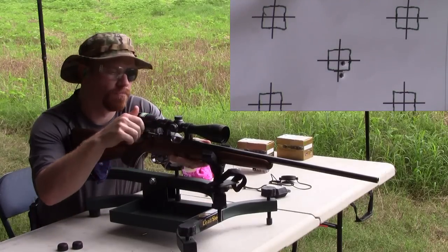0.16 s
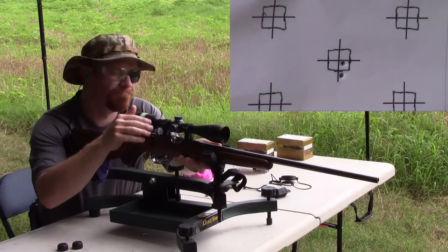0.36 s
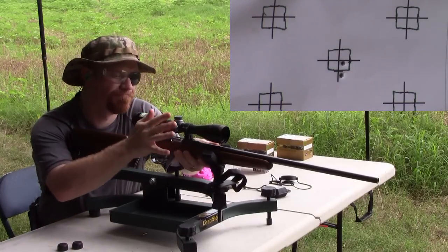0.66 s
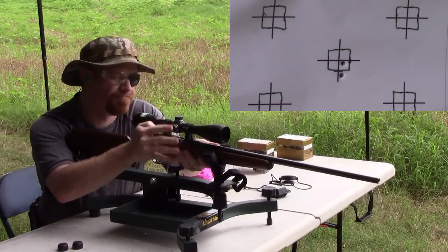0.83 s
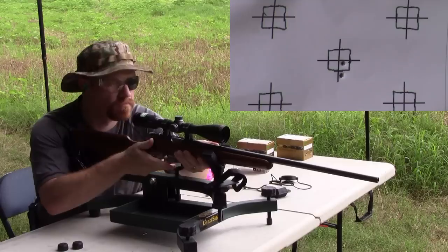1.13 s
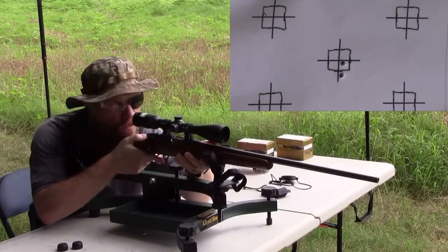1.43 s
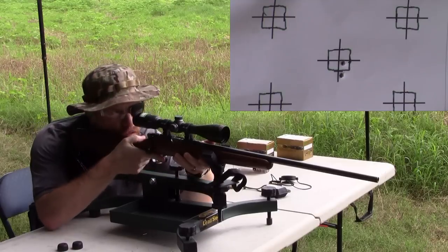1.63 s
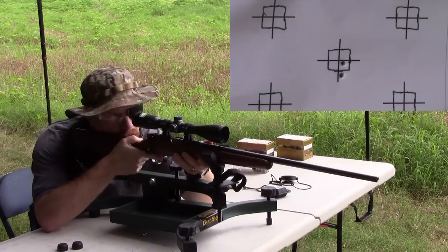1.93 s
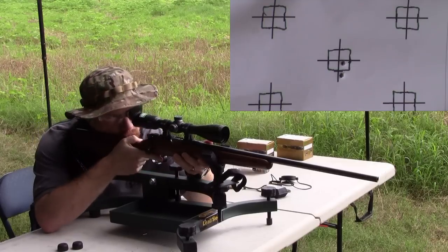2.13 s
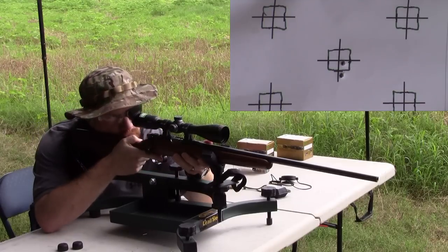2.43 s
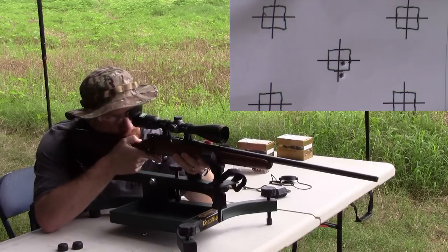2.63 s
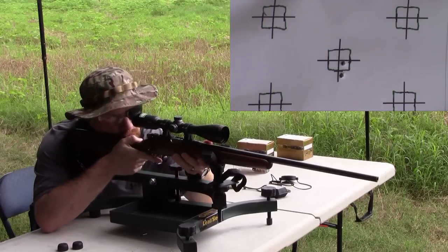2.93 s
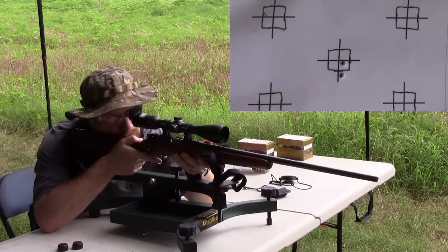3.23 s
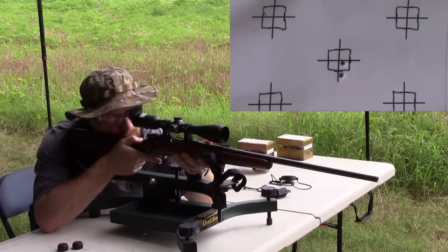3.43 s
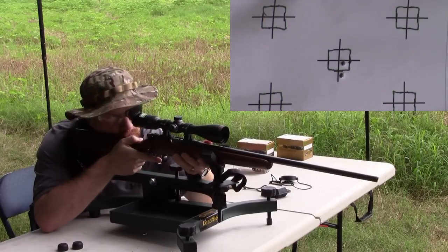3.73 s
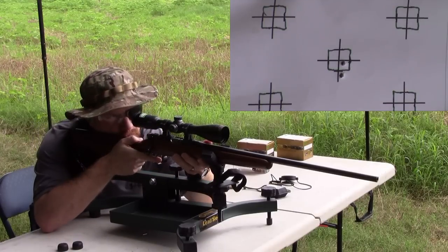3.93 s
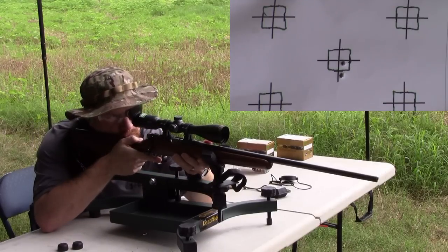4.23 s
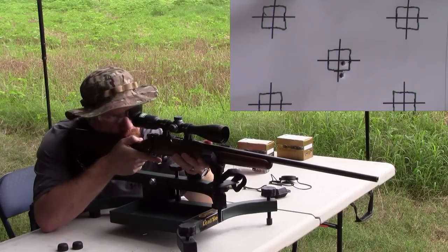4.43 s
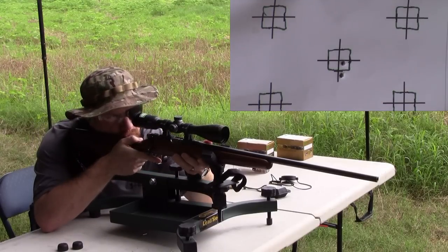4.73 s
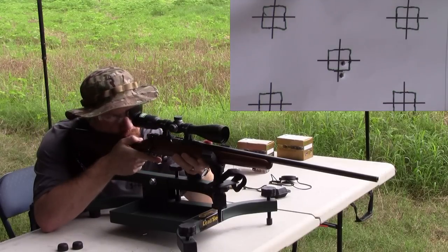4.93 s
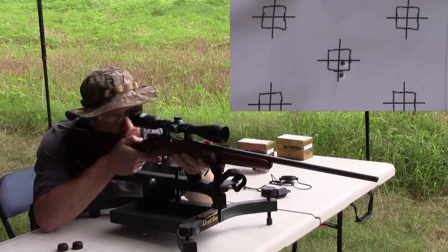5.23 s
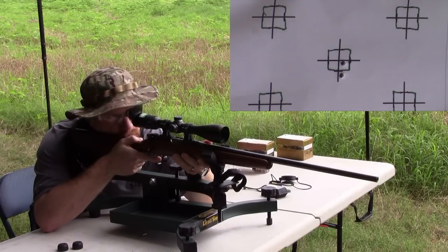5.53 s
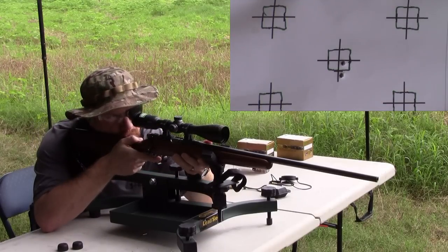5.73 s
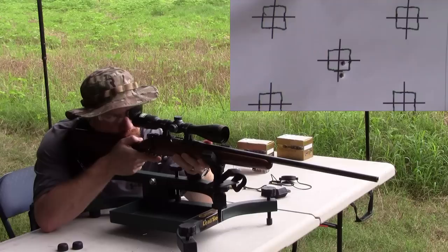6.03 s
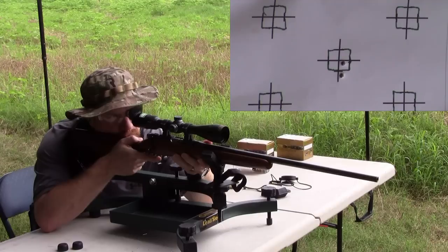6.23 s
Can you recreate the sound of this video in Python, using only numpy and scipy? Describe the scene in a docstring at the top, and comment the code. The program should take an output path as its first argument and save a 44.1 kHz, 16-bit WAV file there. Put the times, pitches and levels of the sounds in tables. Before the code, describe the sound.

At 0 s the low, hollow tail of a knock on an outdoor bench is fading, gone within about half a second. Close to the microphone, slightly left, a rifle bolt is closed: a faint bright tick at 0.5 s, a tight cluster of metallic clacks and rattle from 0.66 to 0.78 s, lighter clicks around 0.91 s, and a hard, sharp clack at 1.03 s, with very short reflections. No shot follows. Throughout, a katydid rasps high, dry pulses between five and six times a second over a thin, wide insect hiss. Soft far traffic murmurs, its tyre roar swelling near 3.7 s, while leaf rustle gradually settles. Small dull distant knocks come at 2.2, a few around 2.7, then 3.4, 3.9 and faintly 4.75 s. A low engine hum and drone rise slightly from about 5.5 s to the end at 6.4 s.

```python
"""First a knock on an outdoor bench, already dying away; then a small-bore rifle's bolt is closed close by.
The bolt is noise chatter ringing the rifle's modes, with rattle around it and short echoes; no shot falls.
A katydid throbs in the meadow as bursts of rasped noise, over an insect chorus of flickering noise bands.
Far off: shaped-noise traffic murmur, tyre roar, leaves and drone, a sine engine hum and a few dull knocks."""
import sys
import numpy as np
from scipy import signal
from scipy.fft import rfft, irfft
from scipy.io import wavfile

SR = 44100
rng = np.random.default_rng(int(sys.argv[2]) if len(sys.argv) > 2 else 0)


def to_wav(sig):
    """Store sig (one row per channel, or 1-D mono) as 16-bit WAV at the path in sys.argv[1].

    Samples outside -1..1 are clipped; the rate is SR.
    """
    pcm = np.clip(np.atleast_2d(sig), -1, 1) * 32767
    pcm = np.round(pcm).astype(np.int16)
    wavfile.write(sys.argv[1], SR, pcm.T)  # frames by channels


N = 280917
TIME = np.arange(N) / SR   # s


# Bolt contacts close by: (time [s], level at the turning pitch over 10 ms [dB rms], turning pitch [Hz],
# slope below it [dB lost per octave down], slope above it [dB lost per octave up], rise [ms], hold [ms]);
# a slope is negative where the level keeps rising away from the turning pitch
BOLT_CONTACTS = [(0.4995, -53.5, 12000, 2.5, -5, 0.56, 5.5), (0.665, -41, 7550, 11.5, 25, 0.74, 1.3),
                 (0.686, -47, 5200, 3, 8, 0.77, 1.5), (0.69, -32.5, 2760, 7.5, 5.5, 2.45, 1.5),
                 (0.702, -50, 2400, 7, 14, 0.51, 3.4), (0.715, -51, 2600, 20, 17, 1.1, 1.5),
                 (0.727, -54, 3000, 4, 16, 0.62, 6.7), (0.7395, -30.5, 1120, 17, 2, 2.6, 3.2),
                 (0.817, -63, 5200, 6, 9, 1.1, 9), (0.841, -51, 1900, 14, 13, 1, 8.3),
                 (0.906, -43, 2700, 7, 15, 1.3, 0.6), (0.912, -43, 1700, 12, 25, 0.61, 0.6),
                 (0.921, -37, 2940, 4.5, 12.5, 2.35, 2.5), (1.035, -30.5, 1990, 6, 12.5, 0.4, 2.1),
                 (1.048, -50.5, 1700, -2, 16, 1.2, 1.8), (1.068, -61, 1750, 3, 12, 1.1, 2.5)]
# Modes of bolt, receiver and stock: (frequency [Hz], width [Hz], level [dB])
RIFLE_MODES = [(591, 48, -2), (827, 116, -2), (1150, 57, -0.5), (1434, 240, 0), (1763, 59, 2),
               (1934, 134, -1), (2107, 146, -0.5), (2500, 124, 3.5), (3080, 194, 2), (3590, 95, -2),
               (3727, 92, 0.5), (4380, 200, 1), (4880, 270, 2.5), (5710, 99, -1), (5830, 170, 1),
               (6300, 230, 5), (6840, 350, 1.5), (7220, 180, 1.5), (7990, 170, 1), (8170, 180, 3.5),
               (8870, 260, 4.5), (9570, 260, 5), (10440, 430, 1), (11100, 170, -1.5), (11670, 340, 0.5),
               (13600, 1700, 0.5), (15400, 1200, -13)]
CONTACT_FALL_MS = 1.13   # time to fall to 1/e
RIFLE_PAN_DB = 1.1       # left over right


def bolt():
    """Each contact is a few ms of uneven metal chatter into the rifle's modes, sloped about a turning pitch."""
    out = np.zeros(N)
    t_ms = np.arange(SR // 8) / SR * 1000
    for start_s, level_db, turn_hz, below_db, above_db, rise_ms, hold_ms in BOLT_CONTACTS:
        rise = np.minimum(t_ms / rise_ms, 1) ** 2
        fall = np.exp(-np.maximum(t_ms - rise_ms - hold_ms, 0) / CONTACT_FALL_MS)
        chatter = rise * fall * rng.standard_normal(len(t_ms))
        chatter[round(rise_ms * SR / 1000)] += 2.5   # the first full metal-on-metal blow stands out
        at = round(start_s * SR)
        for hz, width_hz, mode_db in RIFLE_MODES:
            # a mode only speaks near its pitch
            near_pitch = band(chatter, hz * 0.81, min(hz * 1.306, 19000), order=2)
            ring = resonate(near_pitch, hz, width_hz)
            ring *= np.sqrt(SR / 100 / np.sum(ring ** 2))   # rms 1 over 10 ms
            octaves = np.log2(hz / turn_hz)
            loss_db = max(above_db * octaves, -below_db * octaves)
            out[at:at + len(t_ms)] += from_db(level_db + mode_db - loss_db) * ring
    return panned(out + bolt_rattle(), RIFLE_PAN_DB)


# Rattle around the bolt contacts: (start [s], end [s], dull rattle level [dB], bright rattle level [dB])
RATTLES = [(0.483, 0.526, -70, -62.5), (0.684, 0.775, -51, -49), (.92, 0.943, -52.5, -63),
           (1.06, 1.065, -51.5, -76)]
RATTLE_RISE_DB_PER_S, RATTLE_FALL_DB_PER_S = 800, 242
RATTLE_EDGE_HZ = 4100   # parts the dull rattle from the bright


def bolt_rattle():
    """Uneven noise through the rifle's modes; each rattle rises quickly and dies away more slowly."""
    uneven = rng.standard_normal(N) * from_db(3.6 * drift(63))
    # the modes are three times broader than under the contacts
    sound = body(uneven, [(hz, 3 * width_hz, db) for hz, width_hz, db in RIFLE_MODES])
    dull = rms_one(band(sound, 500, RATTLE_EDGE_HZ, order=1))
    bright = rms_one(band(sound, RATTLE_EDGE_HZ, 17000, order=1))
    out = 0
    for start_s, end_s, dull_db, bright_db in RATTLES:
        before_db = RATTLE_RISE_DB_PER_S * np.maximum(start_s - TIME, 0)
        after_db = RATTLE_FALL_DB_PER_S * np.maximum(TIME - end_s, 0)
        rattle = from_db(dull_db) * dull + from_db(bright_db) * bright
        out = out + from_db(-before_db - after_db) * rattle
    return out


# Near reflections off bench top, canopy and ground: (left delay [ms], right delay [ms], level [dB])
NEAR_ECHOES = [(1.315, 1.9, -14), (3.9, 3.4, -34), (8.98, 6.6, -21.5), (14.85, 11, -32), (24, 25, -33)]


def echoes(x):
    """A few near reflections add delayed, weaker copies, at other delays in each channel."""
    out = x.copy()
    for *delays_ms, db in NEAR_ECHOES:
        for channel, ms in enumerate(delays_ms):
            lag = round(ms * SR / 1000)
            out[channel, lag:] += from_db(db) * x[channel, :-lag]
    return out


# Bench modes under way at the start: (frequency [Hz], level [dB], time to fall 60 dB [s])
BENCH_MODES = [(267, -35, 0.12), (288, -35, 0.11), (353, -37.5, 0.19), (513, -47, 0.32), (917, -55, 0.6),
               (1263, -54, 0.48), (1790, -52, 0.33), (2630, -64, 0.46)]
# Spectrum of the knock's noisy wash: (frequency [Hz], relative level [dB per Hz])
WASH_SPECTRUM = [(120, -29), (200, -14), (340, -3.5), (763, -15.5), (933, -10), (9750, -21.5), (16000, -32)]
WASH_DB, WASH_T60_S = -44, 0.52


def first_knock():
    """Bench modes ring as decaying sines with a noisy wash, both already dying."""
    rings = 0
    for hz, db, t60_s in BENCH_MODES:
        sine = np.sin(2 * np.pi * (hz * TIME + rng.random()))
        rings = rings + from_db(db - 60 * TIME / t60_s) * sine
    hz = np.maximum(np.fft.rfftfreq(N, 1 / SR), 20)
    mid, side = irfft(rfft(rng.standard_normal((2, N))) * from_db(at_hz(WASH_SPECTRUM, hz)), N)
    wash = rms_one(pair(mid, side, 0.67))
    return rings + from_db(WASH_DB - 60 * TIME / WASH_T60_S) * wash


# Chirps of the nearest katydid in the meadow: (centre time [s])
CHIRP_TIMES = [0.008, 0.162, 0.335, 0.503, 0.692, 0.86, 1.023, 1.188, 1.36, 1.548, 1.725, 1.908, 2.11,
               2.289, 2.502, 2.672, 2.878, 3.075, 3.26, 3.445, 3.63, 3.802, 3.971, 4.18, 4.355, 4.541,
               4.741, 4.92, 5.098, 5.277, 5.431, 5.641, 5.801, 5.983, 6.198, 6.36]
# Resonances of its wing: (frequency [Hz], width [Hz], level [dB])
WING_MODES = [(9100, 610, 8.5), (9790, 200, 18), (10400, 590, 9)]
# Band its song is held to: (low edge [Hz], high edge [Hz])
WING_BAND = [8650, 10800]
WING_STROKES_PER_S = 140                  # mean; it wanders
CHIRP_S = 0.052                           # width at half power
CHIRP_DB, CHIRP_FADE_DB_PER_S = -54.5, 0.5
CHIRP_SPREAD_DB = 0.6                     # from chirp to chirp


def katydid():
    """Bursts of wing strokes; every stroke rasps the file's teeth into the wing's resonance."""
    bursts = 0
    for centre_s in CHIRP_TIMES:
        shape = np.exp(-np.log(2) * np.abs(2 * (TIME - centre_s) / CHIRP_S) ** 3 / 2)
        bursts = bursts + from_db(CHIRP_SPREAD_DB * rng.standard_normal()) * shape
    turns = np.cumsum(WING_STROKES_PER_S * (1 + 0.0396 * drift(7.6))) / SR
    strokes = 1 + 0.3 * np.cos(2 * np.pi * turns)

    def rasp():
        """Stroke-modulated noise through the wing."""
        return rms_one(band(body(strokes * rng.standard_normal(N), WING_MODES), *WING_BAND))

    level = from_db(CHIRP_DB - CHIRP_FADE_DB_PER_S * TIME)
    return level * bursts * pair(rasp(), rasp(), 0.28)


# Steady insects across the meadow: (frequency [Hz], width [Hz], level [dB],
# left-right likeness [-1 to 1], flicker spread [dB], flicker rate [per s])
INSECT_BANDS = [(4324, 83, -74, 0.57, 2, 3.3), (4920, 690, -64.5, 0.52, 1, 60),
                (6570, 75, -78.5, 0.3, 3, 4.8), (6750, 630, -76.5, 0.1, -4.5, 7.9),
                (9150, 480, -70, 0.22, 4, 17), (9850, 990, -61.5, 0.056, 1, 4),
                (13200, 640, -93, 0.14, 3, 10)]


def chorus():
    """Many far insects blur into flickering noise bands with steep edges."""
    out = 0
    for hz, width_hz, db, alike, flicker_db, rate in INSECT_BANDS:
        mid, side = band(rng.standard_normal((2, N)), hz - width_hz / 2, hz + width_hz / 2)
        out = out + from_db(db + flicker_db * drift(rate)) * rms_one(pair(mid, side, alike))
    return out


# Far knocks: (time [s], peak level [dB], pan, left over right [dB])
FAR_KNOCKS = [(2.218, -44.5, 0), (2.683, -39.5, 2), (2.7015, -46.5, -5), (2.753, -42.5, 4), (3.39, -40, 2),
              (3.889, -42, 3), (4.751, -49, 4)]
KNOCK_HZ, KNOCK_WIDTH_HZ = 674, 400


def far_knocks():
    """Short blows, a click resonated twice, dulled by distance to a cycle or two."""
    out = np.zeros((2, N))
    click = -signal.unit_impulse(SR // 20)
    thud = resonate(resonate(click, KNOCK_HZ, KNOCK_WIDTH_HZ), KNOCK_HZ, KNOCK_WIDTH_HZ)
    thud /= np.abs(thud).max()
    for start_s, db, pan_db in FAR_KNOCKS:
        at = round(start_s * SR)
        out[:, at:at + len(thud)] += from_db(db) * panned(thud, pan_db)
    return out


# Levels in the distance: (time [s], tyre roar level [dB], engine level [dB])
FAR_LEVELS = [(0, -57.5, -69.5), (.35, -62, -70.5), (.8, -70, -69), (1.3, -62.5, -73), (1.6, -69, -67.5),
              (2.3, -63.5, -71), (2.45, -61, -66.5), (3.4, -59.5, -67), (3.7, -54.5, -64), (4.15, -64, -69),
              (4.7, -59, -67), (5.46, -60, -69.5), (5.95, -63.5, -62.5), (6.25, -58.5, -60.5),
              (6.37, -65, -63)]


def distance():
    """Traffic murmur, tyre roar, settling leaves and a faint drone as noise, with the hum of an engine."""
    roar_db, engine_db = in_time(FAR_LEVELS)
    noises = murmur() + tyre_roar(roar_db) + rustle() + drone()
    return panned(noises, 0.24) + engine(engine_db)


def tyre_roar(level_db):
    """Noise resonated twice around 823 Hz, swelling with the given level and flickering."""
    mid, side = resonate(resonate(rng.standard_normal((2, N)), 823, 370), 823, 370)
    return from_db(level_db + 1.6 * drift(16.0)) * rms_one(pair(mid, side, 0.8))


ENGINE_HZ, ENGINE_MEAN_DB = 114.1, -67.5   # pitch at mean level, before its slight wander
ENGINE_PULL_HZ_PER_DB = 0.5
OVERTONES_DB = [-75.5, -80]                # 2nd and 3rd partials at mean level
OVERTONES_FOLLOW = 1.5                     # dB per dB of the engine


def engine(level_db):
    """A hum of three partials whose pitch and overtones rise as it pulls harder."""
    pull_db = level_db - ENGINE_MEAN_DB
    hz = (ENGINE_HZ + ENGINE_PULL_HZ_PER_DB * pull_db) * (1 + 0.0111 * drift(4.85))
    phase = 2 * np.pi * np.cumsum(hz) / SR
    partials_db = [level_db] + [db + OVERTONES_FOLLOW * pull_db for db in OVERTONES_DB]
    hum = 0
    for k, db in enumerate(partials_db, 1):
        hum = hum + from_db(db + 1.1 * drift(3.8)) * np.sin(k * phase)
    return np.sqrt(2) * hum   # levels are rms


RUSTLE_DB, RUSTLE_FADE_DB_PER_S = -59.5, 4


def rustle():
    """Leaves that settle: broad noise around 3600 Hz, fading steadily."""
    mid, side = resonate(rng.standard_normal((2, N)), 3600, 3400)
    return from_db(RUSTLE_DB - RUSTLE_FADE_DB_PER_S * TIME) * rms_one(pair(mid, side, 0.28))


# Faint far drone: (frequency [Hz], width [Hz], level [dB])
DRONE_MODES = [(182, 8.2, -7), (254, 15, -4), (367, 25, -6)]
DRONE_DB, DRONE_SWELL_S, DRONE_SWELL_DB_PER_S = -72, 5.3, 13   # the swell starts at 5.3 s


def drone():
    """Noise through narrow low resonances, swelling towards the end."""
    level_db = DRONE_DB + DRONE_SWELL_DB_PER_S * np.maximum(TIME - DRONE_SWELL_S, 0)
    return from_db(level_db) * rms_one(body(rng.standard_normal((2, N)), DRONE_MODES))


# Spectrum of far traffic and leaves: (frequency [Hz], relative level [dB per Hz])
AIR_SPECTRUM = [(25, -64), (60, -18), (100, -13), (200, -9), (480, -6), (780, -8.5), (1100, -11),
                (2200, -22), (4000, -24.5), (6000, -29), (8200, -33), (11000, -36.5), (14000, -43),
                (16000, -47)]
# How alike left and right are in it: (frequency [Hz], likeness [-1 to 1])
AIR_LIKENESS = [(30, 0.98), (110, 1), (200, -0.1), (400, -0.45), (800, -0.21), (1800, 0.023), (3500, 0.29),
                (7000, 0.3), (12000, -0.13)]
MURMUR_DB = -53


def murmur():
    """Third-octave bands of stereo noise, each with its own level, flicker and likeness."""
    out = 0
    edges = 25 * 2 ** np.arange(0, 9.5, 1 / 3)   # Hz
    white = rng.standard_normal((2, 2, N))       # neighbouring bands use unrelated noise
    for k, (low, high) in enumerate(zip(edges, edges[1:])):
        mid, side = band(white[k % 2], low, high, order=2)
        hz = np.sqrt(low * high)
        level = from_db(at_hz(AIR_SPECTRUM, hz) + 0.67 * drift(3.3))
        out = out + level * pair(mid, side, at_hz(AIR_LIKENESS, hz))
    return from_db(MURMUR_DB) * rms_one(out)


def from_db(db):
    """Decibels to amplitude."""
    return 10 ** (np.asarray(db) / 20)


def rms_one(x):
    """Scale to an rms of 1."""
    return x / np.sqrt(np.mean(x ** 2) + 1e-20)


def in_time(rows):
    """Draw each column of a table as straight lines over time."""
    times_s, *columns = np.transpose(rows)
    return [np.interp(TIME, times_s, column) for column in columns]


def at_hz(points, hz):
    """Read a spectrum table along log frequency."""
    points_hz, values = np.transpose(points)
    return np.interp(np.log(hz), np.log(points_hz), values)


def drift(rate):
    """Slow random wander of rms 1: low-passed noise drawn every 40 samples."""
    r = np.exp(-80 * np.pi * rate / SR)
    noise = rng.standard_normal(N // 40 + 2002)
    slow = signal.lfilter([1], [1, -2 * r, r * r], noise)[2000:]   # skip the filter's run-in
    return np.interp(np.arange(N) / 40, np.arange(len(slow)), rms_one(slow))


def resonate(x, hz, width_hz):
    """One damped mode: a unit click sets a sine of height 1 ringing."""
    r, w = np.exp(-np.pi * width_hz / SR), 2 * np.pi * hz / SR
    return signal.lfilter([0, np.sin(w)], [1, -2 * r * np.cos(w), r * r], x + 1e-18)


def body(x, modes):
    """Modes in parallel, signs alternating."""
    out = 0
    for k, (hz, width_hz, db) in enumerate(modes):
        out = out + (-1) ** k * from_db(db) * resonate(x, hz, width_hz)
    return out


def band(x, low_hz, high_hz, order=3):
    """Keep the sound between two frequencies."""
    return signal.sosfilt(signal.butter(order, [low_hz, high_hz], "band", fs=SR, output="sos"), x)


def pair(mid, side, alike):
    """Left and right of a given likeness from two unrelated signals."""
    alike = np.clip(alike, -1, 1)
    return np.sqrt((1 + alike) / 2) * mid + np.sqrt((1 - alike) / 2) * side * [[1], [-1]]


def panned(x, pan_db):
    """Set left above right by pan_db."""
    return x * from_db([[pan_db / 2], [-pan_db / 2]])


def scene():
    """The bolt with its echoes, the dying knock, the meadow and the distance."""
    return echoes(bolt()) + first_knock() + katydid() + chorus() + far_knocks() + distance()


RUMBLE_CUT_HZ, CUTOFF_HZ = 61, 15850


def record(dry):
    """The microphone drops the deep bass; the top is cut steeply."""
    dry = signal.sosfilt(signal.butter(2, RUMBLE_CUT_HZ, "high", fs=SR, output="sos"), dry)
    return signal.sosfilt(signal.cheby2(30, 50, CUTOFF_HZ, fs=SR, output="sos"), dry)


dry = scene()
out = record(dry)
to_wav(out)
```